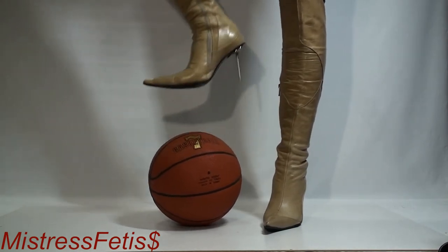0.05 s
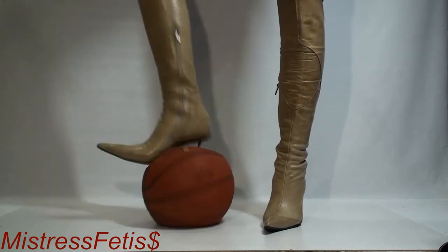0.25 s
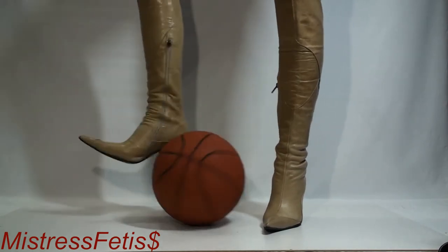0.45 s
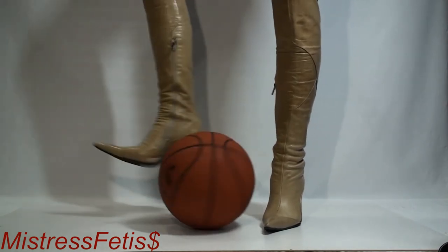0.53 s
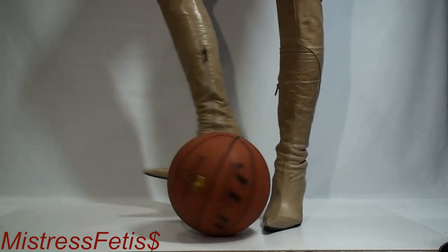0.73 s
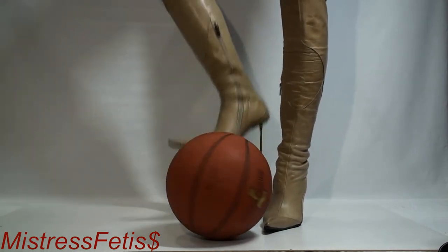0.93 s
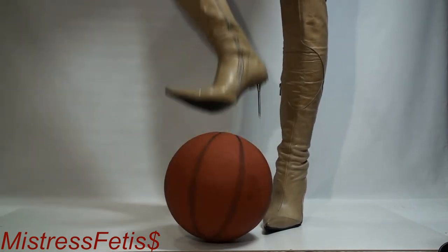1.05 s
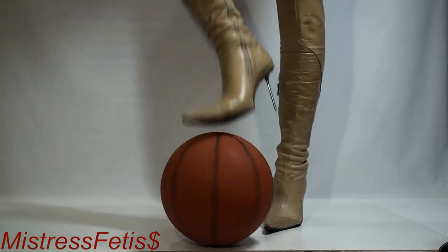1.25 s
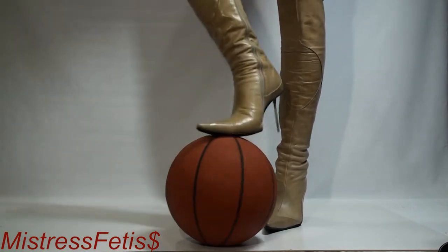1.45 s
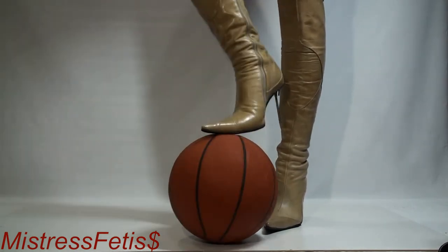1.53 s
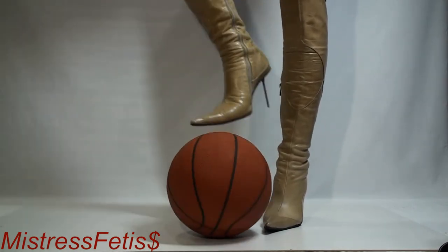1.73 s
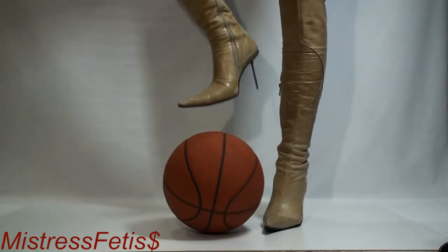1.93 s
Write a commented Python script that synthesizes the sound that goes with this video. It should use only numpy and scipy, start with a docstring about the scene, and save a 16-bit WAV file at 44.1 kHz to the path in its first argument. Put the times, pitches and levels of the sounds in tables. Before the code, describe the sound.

A rubber ball is punctured nearby in a small quiet room: a boot heel thuds, the skin cracks, and air bursts out after a pop. The ball then rolls softly, leaking faintly, with a light knock and patter.

```python
"""A thud, a crack and a pop, then a rush of air that dies away to a faint hiss and light patter.
In a small quiet room, a stiletto heel stamps on an inflated rubber ball and splits its skin.
The heel pops out, and air rushes from the hole, making the hollow ball ring.
The ball rolls off, still leaking, is tapped by the boot and patters on its pebbled skin."""
import sys
import numpy as np
from scipy import signal
from scipy.fft import rfft, irfft
from scipy.io import wavfile

SR = 44100
rng = np.random.default_rng(int(sys.argv[2]) if len(sys.argv) > 2 else 0)


def unload_wav(signal):
    """Save mono or channel-first audio to the path in sys.argv[1] as 16-bit WAV at rate SR, clipped to [-1, 1]."""
    wavfile.write(
        sys.argv[1],
        SR,
        np.round(np.clip(np.atleast_2d(signal).T, -1, 1) * 32767).astype(np.int16),
    )


N = 88200
T = np.arange(N) / SR
HZ = np.fft.rfftfreq(N, 1 / SR)
STAMP_S, POP_S = .2425, .3632  # the heel lands; the heel comes out
AIR_SAME = .93  # how alike left and right are, from 0 to 1


def amp(db):
    """Turns decibels into a gain to multiply by."""
    return 10 ** (np.asarray(db) / 20)


def unit(x):
    """Scales a signal to an average (rms) size of 1."""
    return x / np.sqrt(np.mean(x ** 2) + 1e-20)


def read(points, hz):
    """Reads between (frequency, value) points on a log-frequency axis."""
    f, value = np.transpose(points)
    return np.interp(np.log(hz + 1), np.log(f + 1), value)


def level(points):
    """Gain over time from (time, decibel) points, silent before the first."""
    s, db = np.transpose(points)
    return amp(np.interp(T, s, db, left=-120))


def swells(rows):
    """One smooth rise and fall for each row."""
    return sum(amp(db) * np.sin(np.pi * np.clip((T - s) / length, 0, 1)) for s, length, db in rows)


def noise(gain, same):
    """Stereo noise of size 1: gain shapes its tone, same makes left and right alike."""
    common, own = rng.standard_normal(N), rng.standard_normal((2, N))
    white = np.sqrt(same) * common + np.sqrt(1 - same) * own
    return unit(irfft(rfft(white) * gain, N))


def peak(hz, width_hz):
    """A tone shape that favours one narrow band of pitch."""
    return 1 / (1 + ((HZ - hz) / width_hz) ** 2) / np.sqrt(width_hz)


def flutter(rate_hz, depth_db):
    """A gain that wavers at random, within limits."""
    drift = unit(irfft(rfft(rng.standard_normal(N)) / (1 + (HZ / rate_hz) ** 4), N))
    return unit(amp(depth_db * np.tanh(drift)))


def clicks(rows):
    """One sharp click for each (time, decibel) row."""
    out = np.zeros(N)
    for s, db in rows:
        out[round(s * SR)] += amp(db)
    return out


def colour(x, points):
    """Gives clicks a tone shape, keeping their energy and adding no sound before them."""
    log_gain = np.log(amp(read(points, abs(np.fft.fftfreq(4096, 1 / SR)))))
    response = np.fft.ifft(np.exp(np.conj(signal.hilbert(log_gain)))).real
    return signal.fftconvolve(x, response / np.linalg.norm(response))[:N]


def ring(x, modes):
    """Rings an object's own notes, neighbours swinging opposite ways; each drops 60 dB in its fade."""
    t = T[T < max(row[2] for row in modes)]
    body = sum((-1) ** k * amp(db - 60 * t / fade) * np.sin(2 * np.pi * hz * t)
               for k, (hz, db, fade) in enumerate(modes))
    return signal.oaconvolve(x, body)[:N]


def soften(x, top_hz):
    """Takes off the treble, as a soft rubber contact does."""
    return signal.sosfilt(signal.butter(2, top_hz, fs=SR, output="sos"), x)


def room_tone():
    """A quiet hiss, a thin steady whistle and a whine that comes and goes."""
    # tone of the hiss: f/Hz, relative level/dB
    hiss_tone = [(20, -11), (50, -4), (100, -8), (200, -10.5), (430, -11), (830, -7.5), (1380, -14.5),
                 (2500, -14.5), (3400, -22.5), (4700, -23), (5500, -17), (7500, -19), (11000, -28),
                 (15500, -33)]
    # swells of the whine: t/s, length/s, level/dB
    whines = [(0, 0.26, -62.5), (.92, .25, -58.5), (1.38, 0.17, -58.5), (1.52, 0.065, -56),
              (1.8, 0.24, -58.5)]
    same = 0.58
    whine = swells(whines) * noise(peak(hz=2342, width_hz=45), same)
    whistle = amp(-68) * noise(peak(hz=5480, width_hz=70), same)
    return amp(-55.5) * noise(amp(read(hiss_tone, HZ)), same) + whine + whistle


def room(x):
    """The sound arrives directly, then as a few wall echoes and a short blurred tail."""
    # wall echoes: delay/s, left gain, right gain
    echoes = [(.0032, .15, .1), (0.0127, .2, .14), (0.0153, .14, .2), (.0305, 0.0985, 0.097)]
    # time the tail takes to drop 60 dB: f/Hz, fade/s
    fades = [(60, 0.58), (200, 0.38), (800, 0.28), (3000, 0.22), (8000, 0.36), (15000, 0.26)]
    hz, t, bands = signal.stft(noise(1, same=0.7), SR, nperseg=256)
    fading = amp(-60 * t / read(fades, hz)[:, None])
    tail = signal.istft(bands * fading, SR, nperseg=256)[1][:, :N]
    tail = tail * np.clip(T / 0.0077 - 1, 0, 1)  # eases in after a short gap
    response = amp(-6.5) * tail / np.linalg.norm(tail[0])
    response[:, 0] += 1  # the direct sound
    for delay, left, right in echoes:
        response[:, round(delay * SR)] += left, right
    return signal.fftconvolve(x, response, axes=1)[:, :N]


def sway():
    """The stamp sets off a slow sway of air pressure, too low to hear."""
    # the sway: f/Hz, relative level/dB, fade/s
    note = [(15.2, -32, 2.5)]
    return soften(ring(clicks([(STAMP_S, 0)]), note), top_hz=19.3)


def leather():
    """The boot's leather rustles and brushes the ball, each time brighter or duller."""
    # rustles: t/s, length/s, relative level/dB, treble tilt/(dB per octave)
    rustles = [(-.15, 0.47, -61, 2), (0.146, 0.11, -48.5, 2.5), (.222, 0.051, -33.5, 0),
               (0.801, 0.056, -49, 3), (.91, 0.11, -53, 2), (1.138, 0.072, -49.5, 0),
               (1.295, 0.093, -41, 0.5), (1.92, 0.17, -62, 0)]
    # tone of the leather: f/Hz, relative level/dB
    tone = [(30, -21), (80, -5), (300, 7.5), (900, 1), (1700, 5), (3500, -2.5), (8000, -5), (12000, -12.5),
            (15500, -22)]
    octaves = np.log2((HZ + 100) / 1000)
    rustle = sum(swells([(s, length, db)]) * noise(amp(read(tone, HZ) + tilt * octaves), same=0.74)
                 for s, length, db, tilt in rustles)
    return rustle * flutter(rate_hz=270, depth_db=1.5)


def rolling():
    """The ball rubs over the floor with a low drone that lifts briefly, then sinks as it slows."""
    # strength of the rub: t/s, relative level/dB
    strength = [(.7, -53), (.85, -55), (1, -50), (1.15, -64), (1.29, -54), (1.33, -54), (1.42, -52),
                (1.6, -57), (1.75, -57), (1.88, -52.5), (1.98, -50)]
    # tone of the rub: f/Hz, relative level/dB
    tone = [(60, -7), (250, -10.5), (550, -8.5), (820, -1), (1300, -4), (2200, -17), (3500, -28),
            (15000, -50)]
    # path of the drone: t/s, f/Hz, relative level/dB
    drone = [(1.3, 90.2, -48), (1.42, 90, -69.5), (1.56, 140, -56.5), (1.65, 90, -56.5),
             (1.76, 71.6, -53.5), (1.84, 57.5, -57), (1.93, 54.3, -59), (1.99, 54, -75)]
    rub = level(strength) * flutter(rate_hz=74, depth_db=6) * noise(amp(read(tone, HZ)), same=0.61)
    s, hz, db = np.transpose(drone)
    hum = np.sin(2 * np.pi * np.cumsum(np.interp(T, s, hz)) / SR)
    roughness = 1 + 0.64 * noise(peak(hz=0, width_hz=34), AIR_SAME)
    return rub + level(np.c_[s, db]) * unit(hum * roughness)


def taps():
    """The boot taps the ball, then its pebbled skin patters as it rolls."""
    # knocks: t/s, relative level/dB, pitch ratio
    hits = [(1.3072, -25, 1.03), (1.374, -38, 0.99), (1.422, -40.5, 1.11), (1.451, -47, 1.1),
            (1.485, -41.5, 1), (1.499, -43.5, 1), (1.512, -47.5, 0.85), (1.536, -54, 1.1),
            (1.555, -41.5, 0.97), (1.574, -57, 1.2), (1.596, -42.5, 1.01), (1.64, -48, 1.06),
            (1.657, -42.5, 1.02), (1.738, -46.5, 1.1), (1.779, -48, 1), (1.821, -44, 0.54),
            (1.851, -46, 1.52), (1.879, -48, 0.92), (1.94, -43.5, 1.05), (1.953, -62, 1),
            (1.968, -44, 1.06)]
    # notes of the tapped skin: f/Hz, relative level/dB, fade/s
    notes = [(735, 0, 0.029), (856, -2.5, 0.049), (1142, -12, 0.037), (1630, -13, 0.043),
             (2623, -17.5, 0.027)]
    # tone of each knock's dull push: f/Hz, relative level/dB
    push_tone = [(30, -15), (90, 15), (250, -7), (700, 6.5), (2500, -2), (5000, -18), (15000, -32)]
    knocks = sum(ring(clicks([(s, db)]), np.multiply(notes, [pitch, 1, 1])) for s, db, pitch in hits)
    push = amp(8.5) * colour(clicks([row[:2] for row in hits]), push_tone)
    return -soften(knocks + push, top_hz=2620)


def leak():
    """The last air seeps from the hole with a faint, high hiss."""
    # strength of the leak: t/s, relative level/dB
    strength = [(.7, -57), (.82, -56.5), (1.25, -56.5), (1.6, -58), (1.76, -74), (1.83, -54), (1.98, -51)]
    # tone of the leak: f/Hz, relative level/dB
    tone = [(500, -36), (4300, -20), (7500, -5), (9200, 4.5), (10100, 2.5), (10500, -3), (12500, -10),
            (15500, -26)]
    return level(strength) * noise(amp(read(tone, HZ)), same=0.82)


def gusts():
    """The weakening jet of air turns hollow and fluttery."""
    # gusts: t/s, length/s, relative level/dB
    puffs = [(.53, .2, -37), (.66, 0.12, -43.5)]
    # their tone: f/Hz, relative level/dB
    tone = [(60, -24), (300, -16.5), (620, -6.5), (850, 1.5), (1250, -11.5), (2300, -6), (4000, -38),
            (15000, -40)]
    return swells(puffs) * flutter(rate_hz=120, depth_db=4) * noise(amp(read(tone, HZ)), AIR_SAME)


def jet():
    """Air rushes from the open hole, rings the hollow ball and dulls as the pressure falls."""
    # strength of the jet: t/s, relative level/dB
    strength = [(.362, -28), (.385, -22.5), (.41, -20), (.45, -16), (.478, -23), (.502, -18.5),
                (.545, -23.5), (.6, -28), (.69, -34.5), (.74, -41.5), (.8, -51), (1, -100)]
    # tone of its hiss: f/Hz, relative level/dB
    tone = [(100, -13.5), (400, -31), (900, -9.5), (1450, -4.5), (2000, 1.5), (3000, -2), (5500, -0.5),
            (8000, -2.5), (11500, -5.5), (14500, -13.5), (16000, -21)]
    # notes of the air inside the ball: f/Hz, width/Hz, relative level/dB
    notes = [(1072, 8, -7), (1937, 12, -4), (2130, 40, -6), (2731, 16, -4), (2891, 12, 0), (3008, 10, -4),
             (3860, 60, -4), (4819, 14, -3), (5574, 12, -1), (6186, 16, -3), (7894, 40, -6)]
    treble_hz, dull_db_per_s = 6970, 20.5
    hiss = noise(amp(read(tone, HZ)), AIR_SAME)
    treble = irfft(rfft(hiss) * (1 - 1 / (1 + (HZ / treble_hz) ** 4)), N)
    lost = 1 - amp(-dull_db_per_s * np.maximum(T - POP_S, 0))
    hollow = amp(-9) * noise(sum(amp(db) * peak(hz, width) for hz, width, db in notes), AIR_SAME)
    return level(strength) * flutter(rate_hz=240, depth_db=1.9) * (hiss - lost * treble + hollow)


def spurt():
    """A ragged spurt of air squeezes past the heel while it still plugs the hole."""
    # tone of the spurt: f/Hz, relative level/dB
    tone = [(35, -25), (70, 6), (300, 7.5), (800, 5.5), (1500, -3), (3500, -3), (7000, -9), (12000, -14),
            (15500, -21)]
    start_s, rise_s, fall_db_per_s = .2525, 0.0015, 201
    age = np.maximum(T - start_s, 0)
    shape = np.minimum(age / rise_s, 1) * amp(-16 - fall_db_per_s * age)
    return shape * flutter(rate_hz=300, depth_db=2.5) * noise(amp(read(tone, HZ)), same=0.77)


def glide():
    """The hole widens as the heel leaves, so its hollow note slides up."""
    from_hz, to_hz, slide_s, fade_s = 331, 810, 0.0091, 0.078
    age = np.maximum(T - POP_S, 0)
    hz = to_hz + (from_hz - to_hz) * np.exp(-age / slide_s)
    return amp(-10 - 60 * age / fade_s) * np.sin(2 * np.pi * np.cumsum(hz * (age > 0)) / SR)


def pop():
    """The heel pops free with a puff of air and a short hollow ring."""
    # three quick pops: t/s, relative level/dB
    pops = [(.3632, -14), (.3757, -21.5), (.3779, -19)]
    # notes they ring: f/Hz, relative level/dB, fade/s
    notes = [(560.5, -2.5, 0.097), (762, 0.5, 0.076), (847, 0, 0.036), (1155, 2.5, 0.019)]
    # tone of the puff: f/Hz, relative level/dB
    puff_tone = [(40, -13), (150, -5.5), (320, -3.5), (700, -0.5), (1250, 2.5), (1700, -19), (8000, -54)]
    release = clicks(pops)
    puff = amp(16) * colour(release, puff_tone)
    return soften(glide() + ring(release, notes) + puff, top_hz=1700)


def split():
    """The rubber skin splits with sharp, bright cracks."""
    # cracks: t/s, relative level/dB
    cracks = [(.2524, -2), (.2534, -2), (.2645, -9), (.2751, -8), (.3632, -8), (.3643, -7)]
    # their tone: f/Hz, relative level/dB
    tone = [(100, -15), (700, -4), (2000, 5), (4500, 11), (9000, 7), (15000, -13)]
    return colour(clicks(cracks), tone)


def thud():
    """The boot slaps the ball and makes it ring."""
    # tone of the slap: f/Hz, relative level/dB
    slap_tone = [(20, -23), (39, -26), (55, 11.5), (120, 7), (400, -3.5), (900, -12), (2500, -6.5),
                 (4000, -33), (15000, -56)]
    # notes of the ball under the heel: f/Hz, relative level/dB, fade/s
    notes = [(59, 1.5, 0.11), (75.6, -9.5, 0.4), (117.5, 1.5, 0.14), (141.1, -13, 0.93), (300, -1.5, 0.069),
             (404, 3, 0.087), (505.56, -3.5, 0.21), (556, -2, 0.092), (803, -8, 0.3), (1027, -0.5, 0.14),
             (1366, -25, 0.23), (1746, -8.5, 0.11), (1945, -11.5, 0.17), (2217, -12, .13),
             (2800, -22, 0.16)]
    blow = clicks([(STAMP_S, 0)])
    return amp(4.5) * colour(blow, slap_tone) + amp(-22.5) * ring(blow, notes)


def scene():
    """Ball and boot sound in the room, a little left of centre."""
    stamp = split() - thud() - pop()  # a minus sign flips the wave
    air = spurt() + jet() + gusts() + leak()
    near = stamp + taps() + amp(-3) * (air + rolling() + leather())
    lean_left = amp([[.5], [-.5]])
    return room(near) * lean_left + sway() + room_tone()


def record(dry):
    """Cuts away the very highest treble."""
    top_hz = 15400
    low_pass = signal.firwin(255, top_hz, window=("kaiser", 9), fs=SR)
    return signal.oaconvolve(dry, low_pass[None], "same")


dry = scene()
out = record(dry)
unload_wav(out)
```